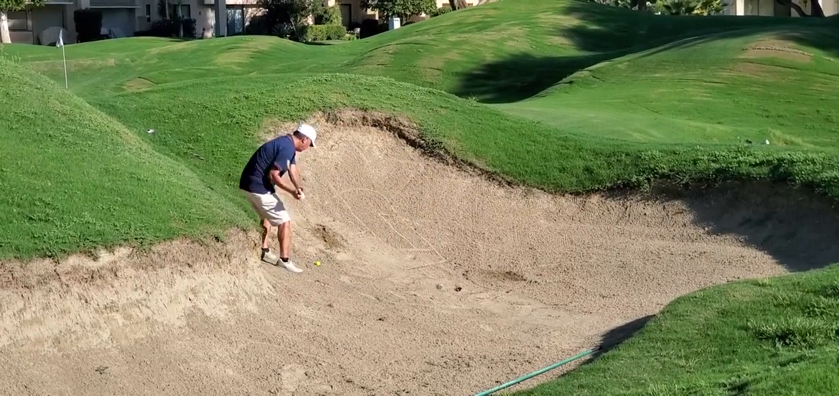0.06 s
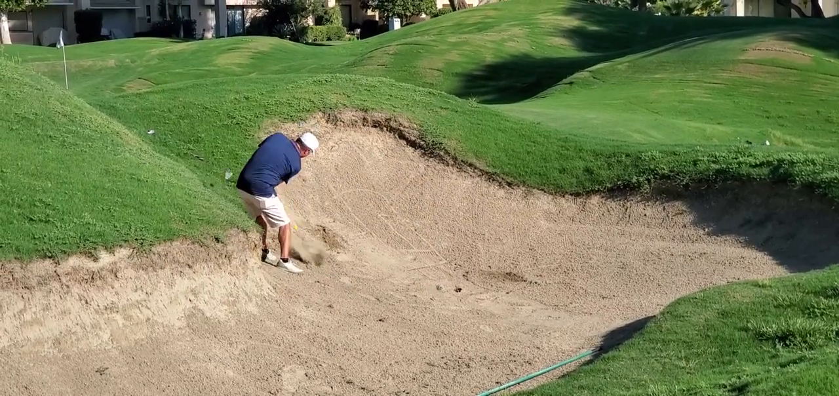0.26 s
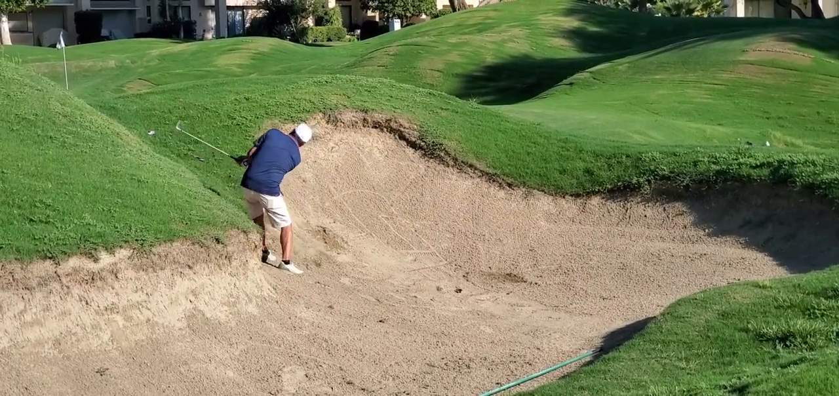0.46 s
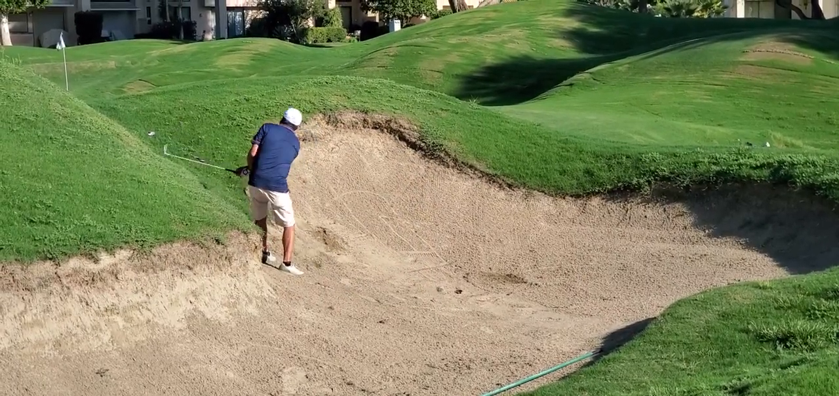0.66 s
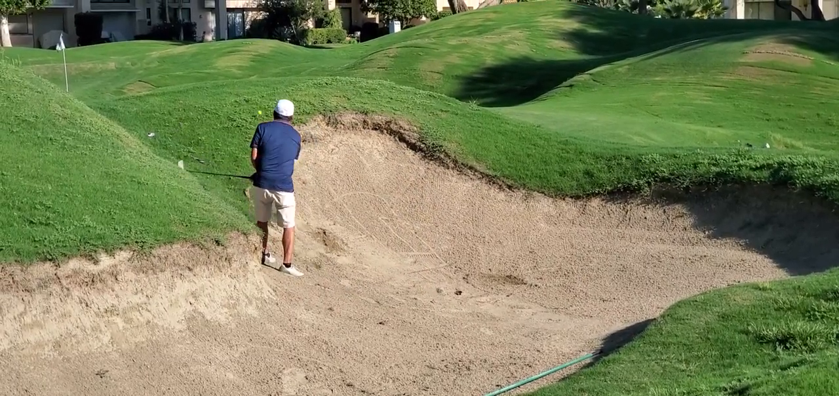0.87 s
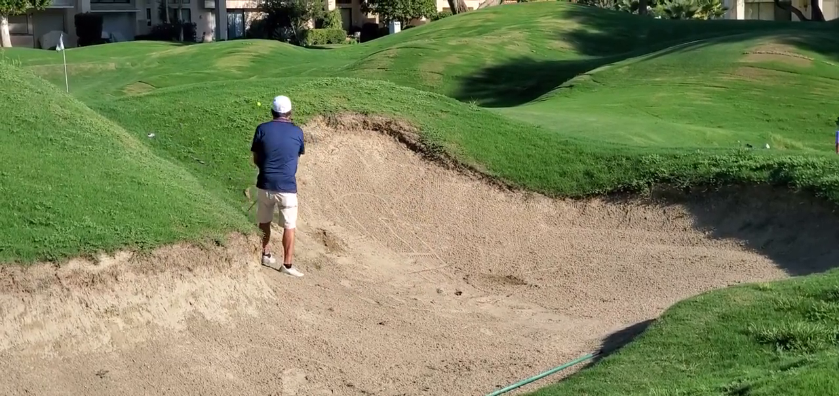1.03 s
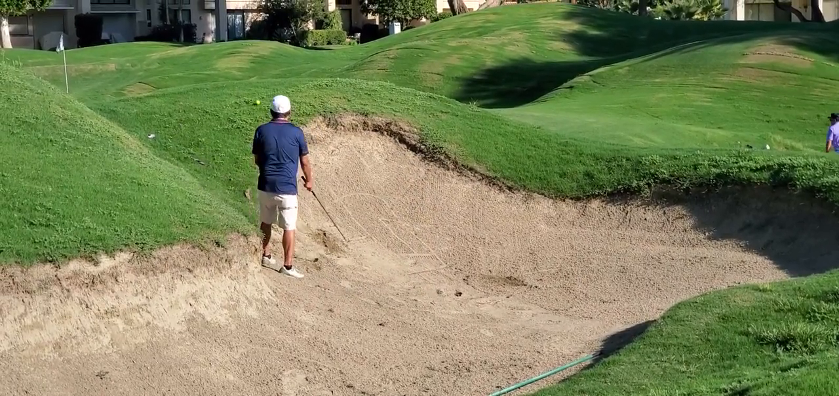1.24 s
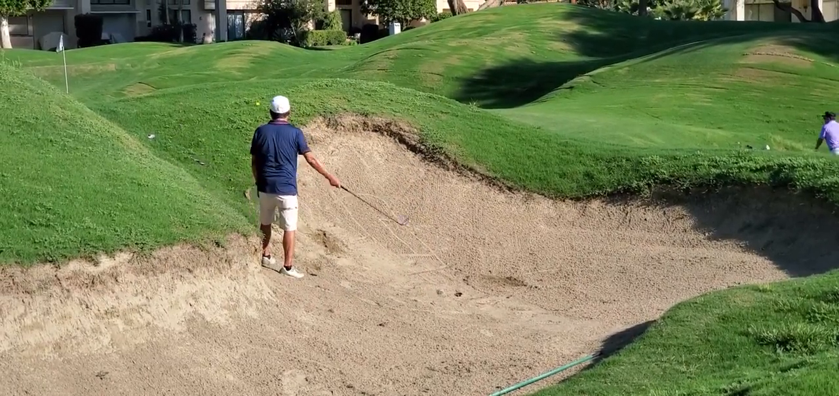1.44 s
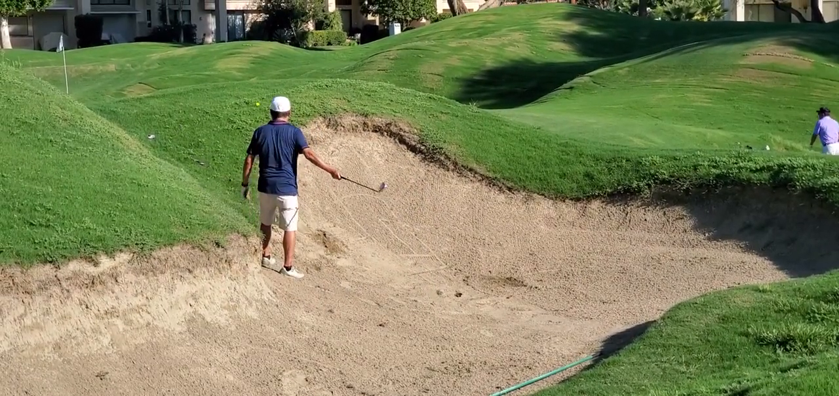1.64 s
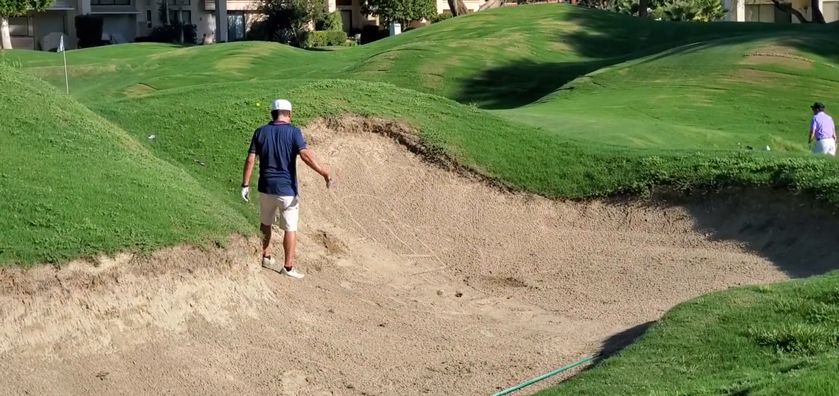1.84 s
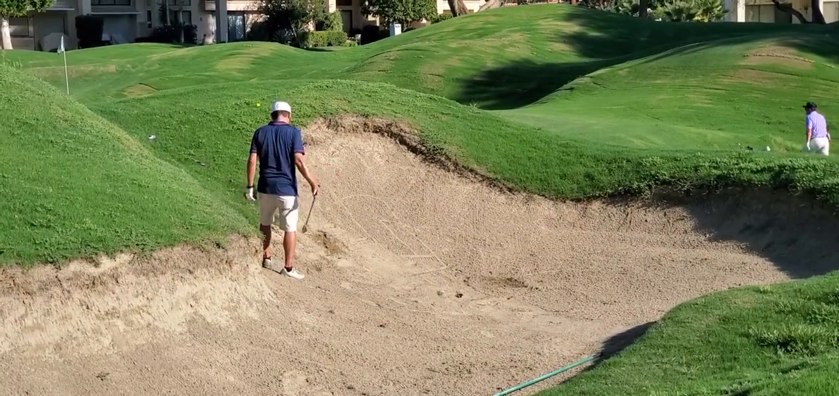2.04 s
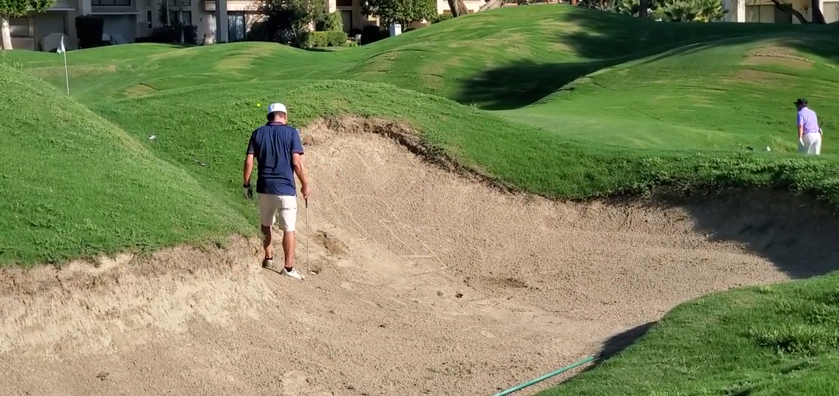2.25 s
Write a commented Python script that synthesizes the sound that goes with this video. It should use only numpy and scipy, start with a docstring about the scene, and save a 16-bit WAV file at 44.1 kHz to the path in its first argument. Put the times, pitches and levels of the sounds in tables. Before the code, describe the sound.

A golf club swishes briefly and strikes sand and ball with one sharp clack at about 0.25 seconds, followed by a short spray of sand. A faint dull bump comes near 0.7 seconds. From about 1.3 to 2 seconds, a few low wind puffs bump the microphone. Throughout, a quiet, high, insect-like hiss continues with a soft outdoor wash and the low hum of a far machine.

```python
"""A swish, a sharp clack and a short spray of sand: a golf shot out of a bunker.
The club rushes through the air, hits sand and ball, and rings briefly as it digs in.
The grassy banks scatter a short tail; a faint dull bump follows. Behind it are a steady high hiss,
as of insects, a soft wash and the hum of a far machine. Later a few wind puffs bump the microphone."""
import sys
import numpy as np
from scipy import signal
from scipy.fft import rfft, irfft, next_fast_len
from scipy.io import wavfile
from scipy.ndimage import map_coordinates

SR = 44100
rng = np.random.default_rng(int(sys.argv[2]) if len(sys.argv) > 2 else 0)


def transcribe(signal):
    """Save signal, clipped to [-1, 1], as a 16-bit WAV file at the path in sys.argv[1]."""
    frames = np.atleast_2d(signal).T
    limited = np.clip(frames, -1, 1)
    pcm = np.round(limited * 32767).astype(np.int16)
    wavfile.write(sys.argv[1], SR, pcm)


N = 101429
STRIKE_S = 0.2493  # club meets sand and ball


def clack(gain_db=13, gap_s=0.001416, second_db=-0.5, second_cutoff_hz=2630, left_lead_s=0.00007):
    """Club on sand and ball: two contacts in quick succession, the second duller."""
    # contact spectrum: f/Hz, level/dB
    spectrum = [(60, -23.5), (240, -4.5), (450, -18), (580, -9.5), (850, -5.5), (1050, 5), (1330, 3),
                (1720, -6.5), (1950, 1), (2400, -26), (3500, -18), (4300, -29.5), (5500, -11), (6200, -37),
                (7400, -13), (10200, -30.5), (11800, -28.5), (13500, -51)]
    impulse = np.zeros(N)
    impulse[round(STRIKE_S * SR)] = -amp(gain_db)
    colour = lambda hz: minimum_phase(amp(along(spectrum, hz)))
    second = lambda hz: amp(second_db) * np.exp(-2j * np.pi * hz * gap_s)
    contacts = lambda hz: 1 + second(hz) / np.hypot(1, hz / second_cutoff_hz)
    return filtered(impulse, lambda hz: colour(hz) * contacts(hz) * ports(hz, left_lead_s))


def thud(delay_s=0.000614):
    """The club head digs in with a short, damped ring."""
    # modes: f/Hz, level/dB, t60/s
    modes = [(259, -33.5, 0.049), (361, -41.5, 0.064), (585, -49, 0.014), (850, -37, 0.044),
             (1300, -30, 0.012), (1980, -29.5, 0.016), (3340, -36.5, .009), (5270, -45, 0.0088),
             (11800, -36.5, 0.0051)]
    t = since(STRIKE_S + delay_s)
    return sum(amp(db) * decay(t, t60) * np.sin(2 * np.pi * hz * t) for hz, db, t60 in modes)


def swish(gain_db=-42, rise_60db_s=0.044):
    """Air noise grows steeply on the downswing and ends at the ball."""
    # air noise spectrum: f/Hz, level/dB
    spectrum = [(150, 4), (450, 4), (830, -3), (1300, 7), (1900, -14), (2800, -15), (4500, -18),
                (8000, -25)]
    return amp(gain_db) * decay(-since(STRIKE_S), rise_60db_s) * noise(spectrum, coherence=1.0)


def sand(crunch_db=-26, spray_db=-47.5, rise_s=0.01, clump_db=5, clump_rate_hz=700):
    """Sand crunches under the club, then flies off in clumps."""
    # crushed sand spectrum: f/Hz, level/dB
    crushed = [(150, 9), (600, -7.5), (1500, 5), (2200, -3.5), (3400, -7.5), (4300, -20.5), (5500, -25.5),
               (7500, -1), (10000, -26), (14000, -35)]
    # flying sand spectrum: f/Hz, level/dB
    flying = [(200, 3), (700, 2.5), (1000, -12), (2100, 8.5), (2700, -4), (4200, -7), (5500, 2.5),
              (9000, -8), (15000, -18)]
    t = since(STRIKE_S)
    crunch = amp(crunch_db) * decay(t, t60_s=0.027) * noise(crushed, coherence=0.7)
    flight = decay(t, t60_s=0.22) * (1 - np.exp(-np.abs(t) / rise_s))
    clumps = unit(amp(clump_db * wobble(clump_rate_hz)))
    return crunch + amp(spray_db) * flight * clumps * noise(flying, coherence=0.3)


def banks(x, gain_db=-33.5, t60_s=0.2):
    """The slopes round the bunker scatter x into a weak, short tail."""
    tail = rng.standard_normal((2, N)) * decay(since(0), t60_s)
    tail /= np.linalg.norm(tail[0])
    return amp(gain_db) * signal.fftconvolve(x, tail, axes=1)[:, :N]


def landing(start_s=0.68, level_db=-51.5, t60_s=0.14):
    """A faint dull bump, perhaps the ball on the turf."""
    # bump spectrum: f/Hz, level/dB
    spectrum = [(60, -0.5), (150, -1), (240, 1), (330, -22), (700, -21), (2000, -59)]
    return amp(level_db) * decay(since(start_s), t60_s) * noise(spectrum, coherence=0.54)


def wind(jitter_rad=0.86, jitter_rate_hz=70):
    """Each eddy shakes the two microphone ports unequally for a few slow cycles."""
    # puffs: t/s, half-width/s, f/Hz, level/dB, left minus right/dB
    puffs = [(1.316, 0.018, 60, -30, -4), (1.395, 0.019, 85, -28.5, 10), (1.459, .012, 74, -40.5, 24.5),
             (1.504, .011, 80, -35.5, 23.5), (1.71, 0.052, 41.8, -39.5, -9), (1.958, 0.009, 58, -32.5, 12),
             (2.0, 0.028, 61.8, -36.5, 15)]
    out = np.zeros((2, N))
    for centre_s, width_s, hz, db, pan_db in puffs:
        t = since(centre_s)
        phase = rng.uniform(0, 2 * np.pi)
        jitter = jitter_rad * np.array([wobble(jitter_rate_hz), wobble(jitter_rate_hz)])
        gains = amp([[db + pan_db / 2], [db - pan_db / 2]])
        out += gains * np.exp(-(t / width_s) ** 2) * np.sin(2 * np.pi * hz * t + phase + jitter)
    return out


def hiss(flutter_db=0.56, flutter_rate_hz=40.1):
    """A high, wide, insect-like hiss that swells slowly."""
    # envelope: t/s, level/dB
    envelope = [(0, -53.5), (.4, -53.5), (.6, -52.5), (1.1, -51.5), (1.42, -54), (1.65, -54), (2.3, -52.7)]
    # hiss spectrum: f/Hz, left level/dB, right level/dB
    spectrum = [(3000, -44, -62), (4340, -26, -30), (4870, -33.5, -16.5), (5580, -11.5, -12.5),
                (6150, -11, -4), (6360, 0, 0), (6400, 2, 1), (7730, 1, 0.5), (8150, 6.5, -6.5),
                (9000, -7, 2.5), (9850, -8, -3.5), (10150, -15, -3.5), (10440, -13.5, 1.5),
                (10800, -3, -0.5), (11500, -6, -.5), (12160, -15.5, -9.5), (13200, -17, -15),
                (15800, -14, -28.5)]
    level_db = np.interp(since(0), *np.transpose(envelope)) + flutter_db * wobble(flutter_rate_hz)
    knots_hz, *sides_db = np.transpose(spectrum)
    colour = lambda hz: amp([along(np.transpose([knots_hz, db]), hz) for db in sides_db])
    return amp(level_db) * unit(filtered(rng.standard_normal((2, N)), colour))


def machine(waver_db=2.5, drift_rad=0.28):
    """A far machine hums, wavering in level and phase."""
    # harmonics: f/Hz, rms level/dB
    harmonics = [(59.2, -51.5), (118.4, -62.5)]
    t = since(0)
    hum = np.zeros(N)
    for hz, db in harmonics:
        peak = np.sqrt(2) * amp(db + waver_db * wobble(rate_hz=7.93))
        hum += peak * np.sin(2 * np.pi * hz * t + drift_rad * wobble(rate_hz=7.11))
    return hum


def rumble(level_db=-51.5):
    """Steady low rumble."""
    # rumble spectrum: f/Hz, level/dB
    spectrum = [(12, -27), (28, 0), (55, 5.5), (85, 2), (125, -11), (165, -19.5), (300, -35.5), (600, -93)]
    return amp(level_db) * noise(spectrum, coherence=0.64)


def air(level_db=-65, left_lead_s=0.00042):
    """A soft, distant outdoor wash, earlier on the left and stronger on the right."""
    # wash spectrum: f/Hz, level/dB
    spectrum = [(100, 6), (260, 2), (450, -6), (750, 3), (1050, -5), (1650, -0.5), (2300, -8.5),
                (3100, -14), (4000, -21.5), (7000, -48.5)]
    # left-right likeness: f/Hz, coherence
    coherence = [(200, 0.93), (1200, 0.39), (2000, 0.18), (4000, 0.22)]
    # balance: f/Hz, left minus right/dB
    balance = [(400, -2.5), (750, -2), (1200, -7.5), (1700, -9.5), (2300, -12), (3100, -2)]
    pan = lambda hz: amp(along(balance, hz) * np.array([[0.5], [-0.5]])) * ports(hz, left_lead_s)
    return amp(level_db) * unit(filtered(noise(spectrum, coherence), pan))


def swells():
    """Two faint low swells far away."""
    # swell peaks: t/s, half-width/s, level/dB
    peaks = [(1.525, 0.1, -68.5), (1.817, 0.097, -68)]
    # swell spectrum: f/Hz, level/dB
    spectrum = [(130, -23), (230, -6), (300, 3), (380, -2.5), (480, -30), (1000, -80)]
    envelope = sum(amp(db) * np.exp(-(since(at_s) / width_s) ** 2) for at_s, width_s, db in peaks)
    return envelope * noise(spectrum, coherence=0.93)


def amp(db):
    """Decibels to gain."""
    return 10 ** (np.asarray(db) / 20)


def unit(x):
    """Scale to rms 1."""
    return x / np.sqrt(np.mean(x ** 2) + 1e-20)


def along(points, hz):
    """Interpolate (f/Hz, value) points on a log frequency axis."""
    knots_hz, values = np.transpose(points)
    return np.interp(np.log(hz + 1), np.log(knots_hz + 1), values)


def since(start_s):
    """Seconds since start_s, per sample."""
    return np.arange(N) / SR - start_s


def decay(t, t60_s):
    """Zero before t = 0, then a fall of 60 dB per t60_s."""
    return (t >= 0) * amp(-60 * np.abs(t) / t60_s)


def wobble(rate_hz):
    """Smooth random curve, rate_hz knots a second."""
    knots = rng.standard_normal(int(N * rate_hz / SR) + 4)
    return map_coordinates(knots, [np.arange(N) * rate_hz / SR])


def filtered(x, response):
    """Apply a complex frequency response to x."""
    size = 2 * next_fast_len(N)
    return irfft(rfft(x, size) * response(np.fft.rfftfreq(size, 1 / SR)), size)[..., :N]


def minimum_phase(gain):
    """Causal response with this gain, by folding the cepstrum."""
    cepstrum = irfft(np.log(gain))
    half = len(cepstrum) // 2
    folded = np.concatenate([cepstrum[:1], 2 * cepstrum[1:half], cepstrum[half:half + 1]])
    return np.exp(rfft(folded, len(cepstrum)))


def noise(spectrum, coherence):
    """Coloured stereo noise of rms 1; left-right coherence is a number or a table over frequency."""
    def mid_side(hz):
        likeness = along(coherence, hz) if np.ndim(coherence) else np.full_like(hz, coherence)
        angle = np.arccos(np.clip(likeness, -1, 1)) / 2
        return amp(along(spectrum, hz)) * [np.cos(angle), np.sin(angle)]
    mid, side = filtered(rng.standard_normal((2, N)), mid_side)
    return unit(np.array([mid + side, mid - side]))


def ports(hz, left_lead_s):
    """Response of the two microphone ports to a sound that reaches the left one first."""
    return np.exp(1j * np.pi * hz * left_lead_s * np.array([[1], [-1]]))


def scene(pan_db=1):
    """The shot, slightly to the right, over the outdoor background."""
    hit = clack()
    shot = (hit + thud() + swish() + sand() + banks(hit)) * amp([[-pan_db], [pan_db]])
    return shot + landing() + hiss() + air() + machine() + swells() + rumble() + wind()


def record(dry, cutoff_hz=15800):
    """Brick-wall low-pass."""
    return filtered(dry, lambda hz: hz < cutoff_hz)


dry = scene()
out = record(dry)
transcribe(out)
```